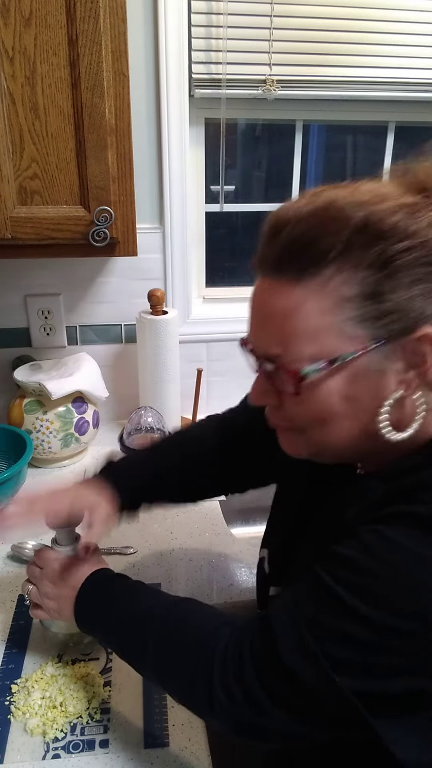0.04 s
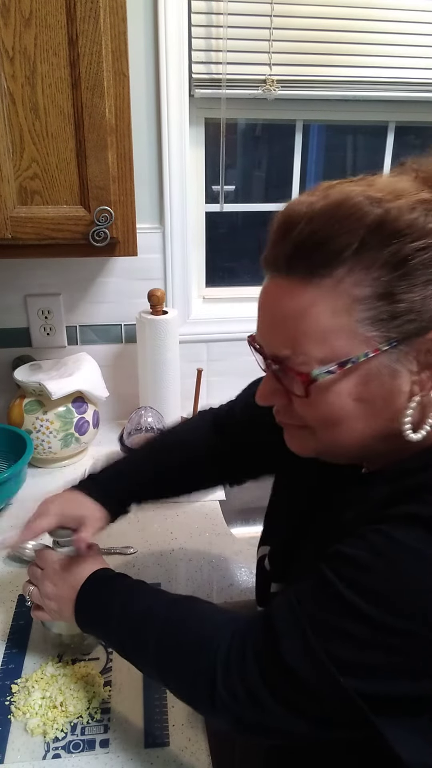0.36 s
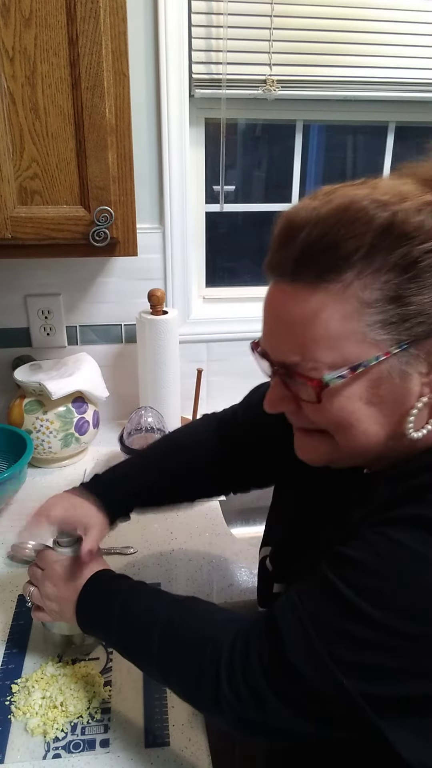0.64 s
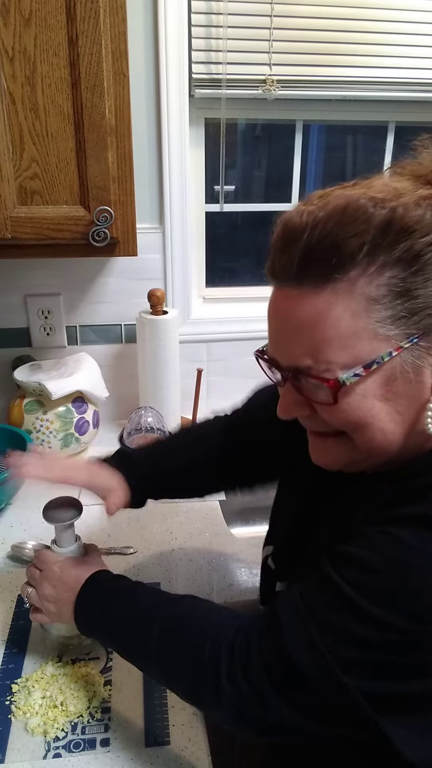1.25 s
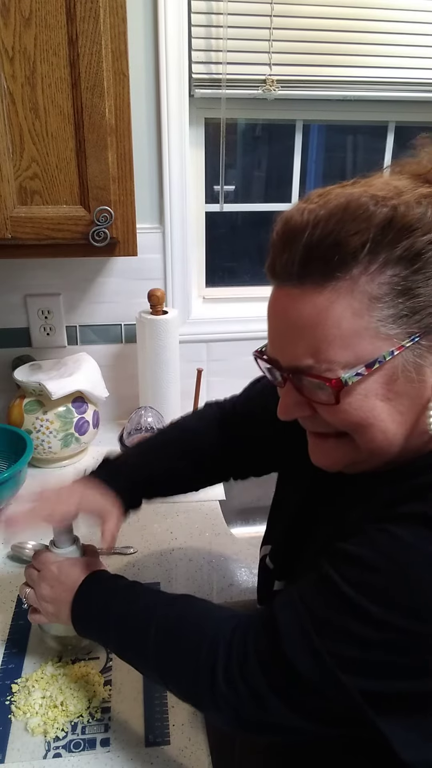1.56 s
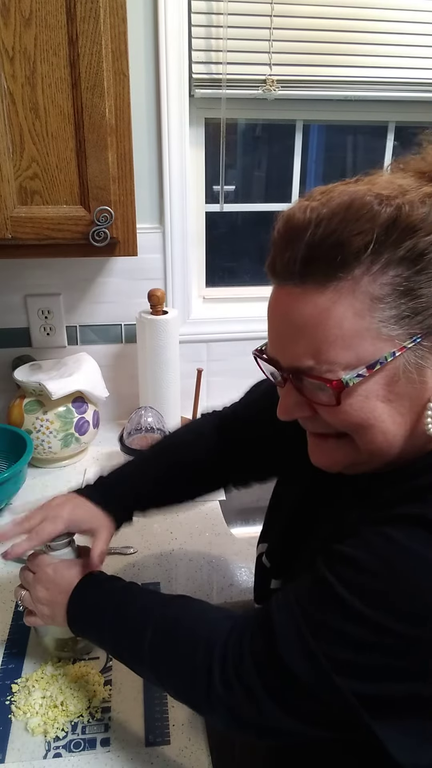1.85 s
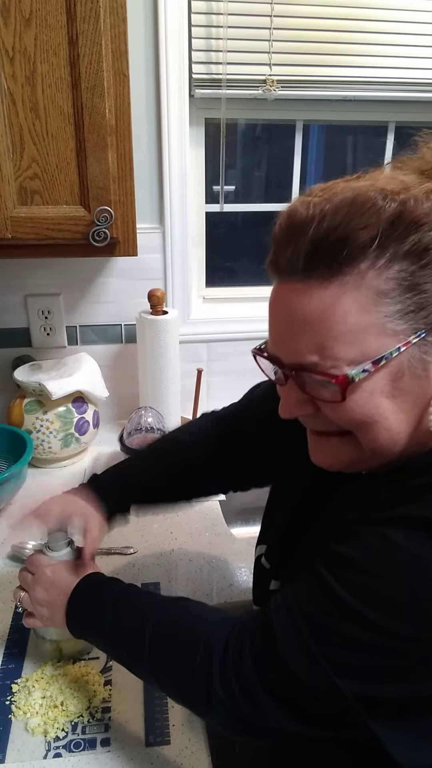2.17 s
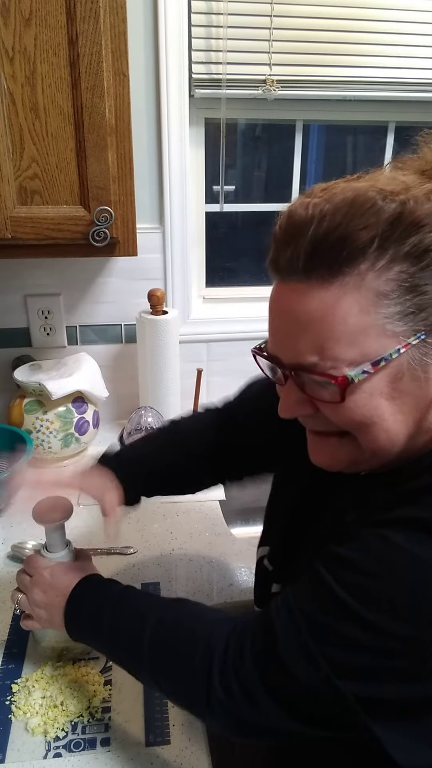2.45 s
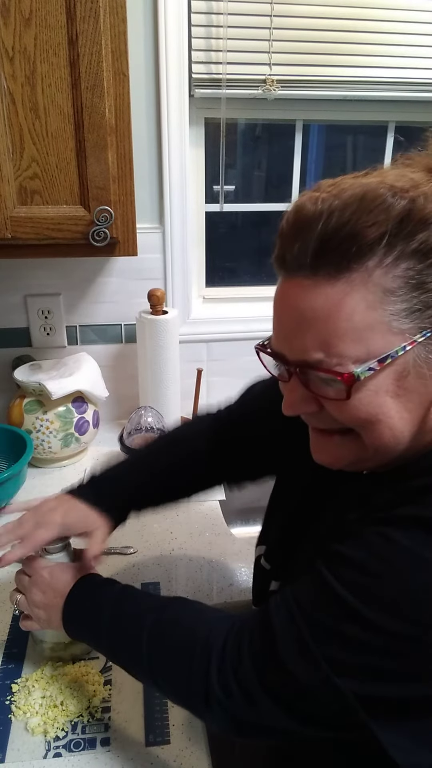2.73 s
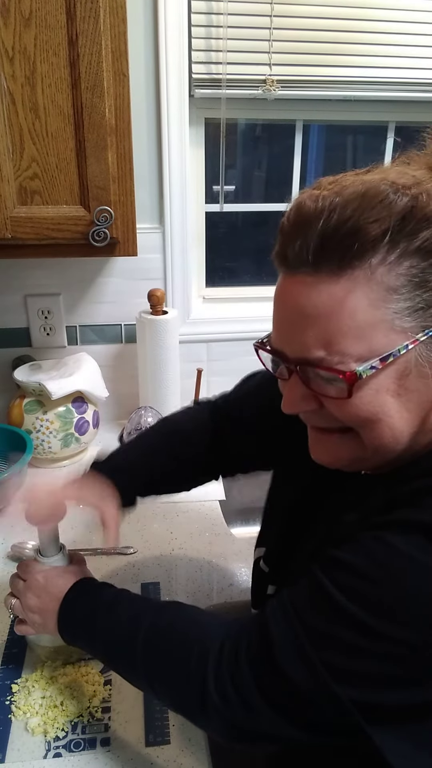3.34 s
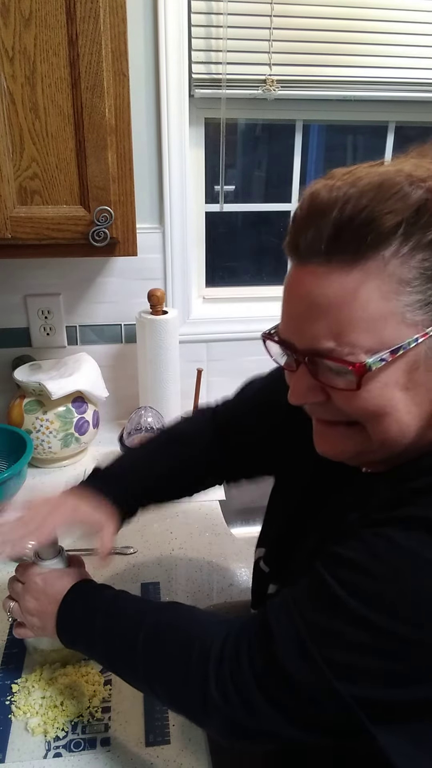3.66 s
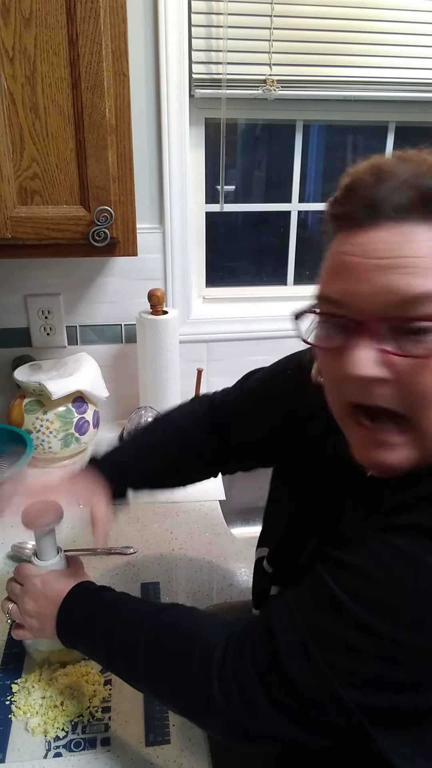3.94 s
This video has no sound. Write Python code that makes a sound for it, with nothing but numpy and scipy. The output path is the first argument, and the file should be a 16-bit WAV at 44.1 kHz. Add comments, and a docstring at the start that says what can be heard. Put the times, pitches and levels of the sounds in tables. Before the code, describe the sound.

A hand food chopper is pounded on a cutting board, nearly six strokes a second. Each stroke clacks and crunches while the counter thumps, and the plunger later rattles back between blows. It sounds close, in a small kitchen.

```python
"""A plunger food chopper pounded on a board on a kitchen counter, nearly six strokes a second.
Each stroke: the palm slaps the knob, the blade turner scrapes, the blades crunch through food and clack
onto the board, the counter thumps. In the later strokes the spring rattles the plunger back to its stop.
A small hard kitchen rings after every blow, over a faint hush."""
import sys
import numpy as np
from scipy import signal
from scipy.fft import rfft, irfft, next_fast_len
from scipy.io import wavfile
from scipy.ndimage import uniform_filter1d

SR = 44100
rng = np.random.default_rng(int(sys.argv[2]) if len(sys.argv) > 2 else 0)


def digitize_waveform(pressure):
    """Quantize a signal to 16-bit integers and store it at the path in sys.argv[1].

    Rows of a 2-D input are taken as channels; values are limited to [-1, 1].
    """
    field = np.atleast_2d(pressure).T
    bounded = np.clip(field, -1, 1)
    quanta = np.round(bounded * 32767).astype(np.int16)
    wavfile.write(sys.argv[1], SR, quanta)


N = 176400
AGE_S = np.arange(N // 8) / SR  # time base of one short sound

# blades hit the board; band gains, low to high: start_s, thump_db, knock_db, clack_db, crack_db
BLOWS = [(0.098,-30,-25,-19,-25),(.266,-24,-19,-15,-20),(.439,-23.5,-16.5,-16,-18.5),(.602,-27,-21.5,-18,-19.5),(0.7537,-27,-25.5,-13,-22.5),(.919,-27,-28,-16.5,-23.5),
         (1.089,-25.5,-28,-12.5,-23),(1.261,-28.5,-30.5,-18,-29),(1.433,-28,-26,-20,-27),(1.612,-38,-35,-32.5,-37.5),(1.773,-37,-36.5,-32.5,-40),(1.934,-27,-23.5,-24,-25),
         (2.122,-25,-27.5,-12.5,-22.5),(2.3001,-32,-31.5,-21,-43),(2.471,-27.5,-27.5,-19,-42.5),(2.659,-24.5,-27,-12.5,-22),(2.836,-27,-27,-16.5,-22),(3.012,-32.5,-30.5,-24,-32.5),
         (3.187,-27.5,-27,-18.5,-24),(3.366,-31.5,-34,-26,-30),(3.5425,-30,-31,-22,-24.5),(3.723,-28,-27,-18.5,-27.5),(3.9017,-28,-27.5,-15,-23)]


def amp(db):
    return 10 ** (np.asarray(db) / 20)


def fade(t60_s):
    return amp(-60 * AGE_S / t60_s)


def noise():
    return rng.standard_normal(len(AGE_S))


def unit(x):
    """Scale to the energy of 10 ms at full level."""
    return x / np.sqrt(np.sum(x ** 2) / (SR / 100))


def add(track, start_s, sound):
    i = max(int(start_s * SR), 0)
    track[i:i + len(sound)] += sound[:max(len(track) - i, 0)]


def colour(x, points):
    """Minimum-phase filter through (freq_hz, gain_db) points."""
    n = next_fast_len(len(x) + 4096, True)
    freq_hz, gain_db = np.array(points, float).T
    bin_hz = np.arange(n // 2 + 1) * SR / n
    gain = amp(np.interp(np.log(bin_hz + 1), np.log(freq_hz), gain_db))
    cepstrum = irfft(np.log(gain), n)
    cepstrum[1:n // 2] *= 2
    cepstrum[n // 2 + 1:] = 0
    return irfft(rfft(x, n) * np.exp(rfft(cepstrum)), n)[:len(x)]


def whiten(x, bins):
    """Level the broad peaks and dips of a burst's spectrum."""
    spectrum = rfft(x)
    power = uniform_filter1d(abs(spectrum) ** 2, bins)
    return irfft(spectrum / np.sqrt(power + 1e-12), len(x))


def grit(rough_db):
    """Noise whose level jumps about every millisecond as parts catch and slip."""
    return noise() * amp(rough_db * np.repeat(noise(), 40)[:len(AGE_S)])


def ring(modes, detune=0, scatter_db=0):
    """Decaying sine modes, with optional random spread of pitch and level."""
    draws = rng.standard_normal((len(modes), 2))
    return sum(amp(db + scatter_db * a) * fade(t60_s) * np.sin(2 * np.pi * hz * (1 + detune * b) * AGE_S)
               for (hz, db, t60_s), (a, b) in zip(modes, draws))


def bursts(events, envelope, spectrum, rough_db):
    """One gritty burst per (start_s, level_db) row."""
    out = np.zeros(N)
    for start_s, level_db in events:
        add(out, start_s, amp(level_db) * unit(colour(grit(rough_db) * envelope, spectrum)))
    return out


def blades():
    """Each blow cracks, rings the cup and crunches the food; the food shifts the blow's colour."""
    # modes of cup, blades and board: pitch_hz, level_db, t60_s
    cup_modes = [(513,-13.5,0.044),(595,-0.5,0.045),(680,-1,0.033),(898,-8.5,0.038),(1140,1.5,0.0083),(1297,-7,0.014),(1598,-8,0.0092),(1870,-6.5,0.023),(1960,-7,0.019),(2173,-9.5,0.015),(2933,-7.5,0.019),(3833,-7,0.012),(4306,-10.5,0.02),(6050,-26,.014)]
    # blade impact spectrum: freq_hz, gain_db
    crack_eq = [(120,-7.5),(300,-9.5),(600,13),(1200,8.5),(1900,5),(2600,0),(4000,4.5),(5500,5.5),(7500,-10),(10000,-65)]
    # food shearing spectrum: freq_hz, gain_db
    crunch_eq = [(250,-13),(550,4),(800,7),(1400,0),(2200,-6),(3200,-2.5),(5000,-1.5),(7500,-2.5),(10000,-32)]
    rise_s, contact_s = 0.00023, 0.0024
    crunch_db, crunch_db_per_s = -2.5, -1.15  # quieter as the food gets finer
    chatter = amp(-5) * fade(t60_s=0.037)
    landing = np.minimum(AGE_S / rise_s, 1) * (1 / (1 + (AGE_S / contact_s) ** 4) + chatter)
    out = np.zeros(N)
    for start_s, thump_db, knock_db, clack_db, crack_db in BLOWS:
        contact = whiten(noise() * landing, bins=200) * (AGE_S < 0.1)
        cup = signal.fftconvolve(ring(cup_modes, detune=0.011, scatter_db=1.5), contact)[:len(AGE_S)]
        crack = unit(colour(contact, crack_eq))
        shear = whiten(grit(rough_db=3) * fade(t60_s=0.27), bins=50) * (AGE_S < 0.3)
        crunch = amp(crunch_db + crunch_db_per_s * start_s) * unit(colour(shear, crunch_eq))
        blow_eq = [(400, thump_db), (560, knock_db), (700, knock_db),
                   (1850, clack_db), (2900, clack_db), (4200, crack_db)]
        add(out, start_s, colour(amp(-1) * unit(cup) + crack + crunch, blow_eq))
    return out


def plunger():
    """The palm slaps the knob, the blade turner scrapes its track, the spring rattles the plunger back."""
    # palm meets knob, plunger slides down: start_s, level_db
    slaps = [(.056,-57.5),(.077,-30.5),(.252,-37),(.426,-34.5),(.587,-32),(.738,-32),(.898,-30),(1.067,-30),(1.240,-31.5),(1.411,-30.5),(1.578,-33),(1.735,-32.5),(1.9155,-31.5),
             (2.1005,-32.5),(2.269,-31),(2.448,-32),(2.636,-32),(2.812,-33),(2.979,-31.5),(3.158,-31),(3.333,-30.5),(3.516,-31.5),(3.701,-32.5),(3.880,-31.5)]
    # slap spectrum: freq_hz, gain_db
    slap_eq = [(50,-9),(120,2.5),(400,-5.5),(1200,1),(2400,-2.5),(4000,-0.5),(6000,-9),(8000,-10)]
    # turner scrapes, plus one early bounce of the plunger at 0.128 s: start_s, level_db
    scrapes = [(.087,-24.5),(.128,-25.5),(.261,-31),(.434,-25),(.594,-38),(.748,-27.5),(.914,-29),(1.080,-23.5),(1.257,-21),(1.425,-26),(1.593,-24.5),(1.753,-21),(1.928,-22),
               (2.114,-17.5),(2.287,-23),(2.4635,-20.5),(2.651,-20.5),(2.828,-26),(2.994,-35),(3.172,-24.5),(3.349,-25),(3.5305,-25.5),(3.712,-21),(3.893,-29)]
    # scrape spectrum: freq_hz, gain_db
    scrape_eq = [(500,-2),(2000,-11.5),(3200,6),(4100,-0.5),(4700,12.5),(5600,2),(6700,11),(8000,-16)]
    # plunger reaches its stop: peak_s, level_db
    returns = [(1.674,-34),(1.833,-33),(1.855,-34.5),(2.041,-38.5),(2.378,-26.5),(2.556,-28.5),(2.744,-28),(2.926,-33.5),(3.094,-30),(3.269,-30.5),(3.447,-29.5),(3.628,-27.5),(3.798,-29)]
    # rattle spectrum: freq_hz, gain_db
    rattle_eq = [(100,-14),(500,-8.5),(1100,6),(2000,-1),(3000,-3),(4600,-3),(6000,-6.5),(8000,-16)]
    scrape_s, return_rise_s, return_t60_s = 0.008, 0.007, 0.015
    slap = bursts(slaps, fade(t60_s=0.1), slap_eq, rough_db=2.5)
    scrape = bursts(scrapes, 1 / (1 + (AGE_S / scrape_s) ** 6), scrape_eq, rough_db=2)
    lead_s = 4 * return_rise_s
    from_peak_s = AGE_S - lead_s
    swell = np.exp(np.minimum(from_peak_s / return_rise_s, -from_peak_s * np.log(1000) / return_t60_s))
    rattle = bursts([(peak_s - lead_s, db) for peak_s, db in returns], swell, rattle_eq, rough_db=3)
    return amp(2) * slap + amp(-6) * scrape + amp(-1.5) * rattle


def counter():
    """The counter heaves under each blow; the thump echoes and leaves a low boom."""
    # counter top modes: pitch_hz, level_db, t60_s, lag_s
    top_modes = [(99.3,10,0.03,.0),(195.2,10,0.022,.003)]
    # low modes of cabinet and room: pitch_hz, level_db, t60_s
    boom_modes = [(60,-16,0.39),(94,-14,0.2),(128.5,-7.5,0.65),(170,-25,0.17),(198.6,-9.5,0.49),(232,-14,0.42)]
    # inverted rebounds from hard surfaces: delay_s, gain_db
    echoes = [(.0198,-4),(.0285,-4)]
    thump_lag_s, heave_rise_s, boom_rise_s = 0.0019, 0.00934, 0.043
    heave, out = np.zeros(len(AGE_S)), np.zeros(N)
    for pitch_hz, level_db, t60_s, lag_s in top_modes:
        add(heave, lag_s, ring([(pitch_hz, level_db, t60_s)]) * np.minimum(AGE_S / heave_rise_s, 1) ** 2)
    heave = unit(heave)
    thump = heave + ring(boom_modes) * np.minimum(AGE_S / boom_rise_s, 1)
    for delay_s, gain_db in echoes:
        add(thump, delay_s, -amp(gain_db) * heave)
    for start_s, thump_db, *_ in BLOWS:
        add(out, start_s + thump_lag_s, amp(thump_db + 4) * thump)
    return out


def kitchen_response():
    """Near cupboards answer at once; ceiling and far walls come later, hold briefly and die away."""
    # far decay by band: freq_hz, t60_s
    decay = [(100,0.4),(500,0.3),(1200,0.42),(2500,0.44),(5000,0.37),(8000,0.39)]
    # reflection spectrum: freq_hz, gain_db
    walls_eq = [(60,-4),(200,-10),(350,9.5),(600,3),(1100,-0.5),(2000,-2.5),(3500,-5.5),(5500,-6.5),(8000,-13.5)]
    far_delay_s, build_s, hold_s = 0.011, 0.01, 0.037
    band_hz, band_t60_s = np.array(decay).T
    spectrum = rfft(noise())
    bin_hz = np.linspace(1, SR / 2, len(spectrum))
    band_position = np.interp(np.log(bin_hz), np.log(band_hz), np.arange(len(band_hz)))
    dying_s = np.maximum(AGE_S - far_delay_s - hold_s, 0)
    tail = np.zeros(len(AGE_S))
    for k, t60_s in enumerate(band_t60_s):
        band = irfft(spectrum * np.maximum(1 - abs(band_position - k), 0), len(AGE_S))
        tail += band * amp(-60 * dying_s / t60_s)
    far = unit(tail * np.clip((AGE_S - far_delay_s) / build_s, 0, 1))
    near = unit(noise() * fade(t60_s=0.12) * np.minimum(AGE_S / build_s, 1))
    taper = np.clip(4 - 5 * AGE_S / AGE_S[-1], 0, 1)
    echoes = whiten(far + amp(0.5) * near, bins=12) * taper
    return amp(2.5) * colour(echoes / np.linalg.norm(echoes), walls_eq)


def kitchen(send):
    """Room reverb; the cook's moving body keeps shifting half of the echo power."""
    sway_hz = 1.305
    phase = 2 * np.pi * sway_hz * np.arange(N) / SR
    weights = np.sqrt(0.5) * np.array([np.ones(N), np.cos(phase), np.sin(phase)])
    return sum(signal.fftconvolve(send * weight, kitchen_response())[:N] for weight in weights)


def nook(send):
    """Standing waves between cupboards, wall and counter."""
    # nook modes: pitch_hz, level_db, t60_s
    modes = [(462,-4,0.52),(557,-3.5,0.53),(562,-2.5,0.23),(745,-2.5,0.89),(846,-2,.35),(932,0.5,.4),(1099,2,.45),(1123,-2.5,.35),(1280,-10.5,.35),(1700,-10.5,.4),(1750,-6.5,.35),(1750,-3,0.53),(1960,-7.5,0.64)]
    return signal.fftconvolve(send, ring(modes))[:N]


def hush():
    """Steady low background noise, unit RMS."""
    # background spectrum: freq_hz, gain_db
    hush_eq = [(30,15.5),(100,-8.5),(400,-11.5),(2000,-27.5),(8000,-42.5)]
    air = colour(rng.standard_normal(N), hush_eq)
    return air / air.std()


def scene():
    """Chopper and counter in the kitchen, over a faint hush; mono."""
    chopper = blades() + plunger()
    thumps = counter()
    room = kitchen(chopper + amp(-8) * thumps) + amp(-58.5) * nook(chopper)
    return (chopper + thumps + room + amp(-60) * hush())[None]


def record(dry):
    """Thin the deep bass, round the loudest peaks, cut the top."""
    low_cut_hz, stopband_hz = 48, 9100
    highpass = signal.butter(4, low_cut_hz, "high", fs=SR, output="sos")
    lowpass = signal.cheby2(14, 70, stopband_hz, fs=SR, output="sos")
    rounded = np.tanh(signal.sosfilt(highpass, dry))
    return signal.sosfilt(lowpass, rounded)


dry = scene()
out = record(dry)
digitize_waveform(out)
```